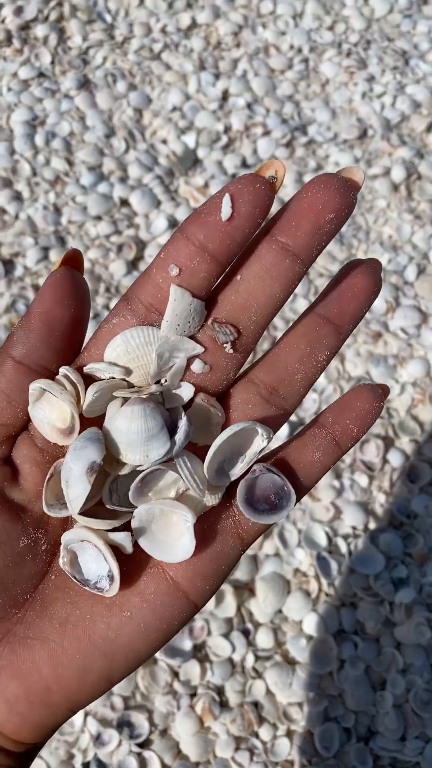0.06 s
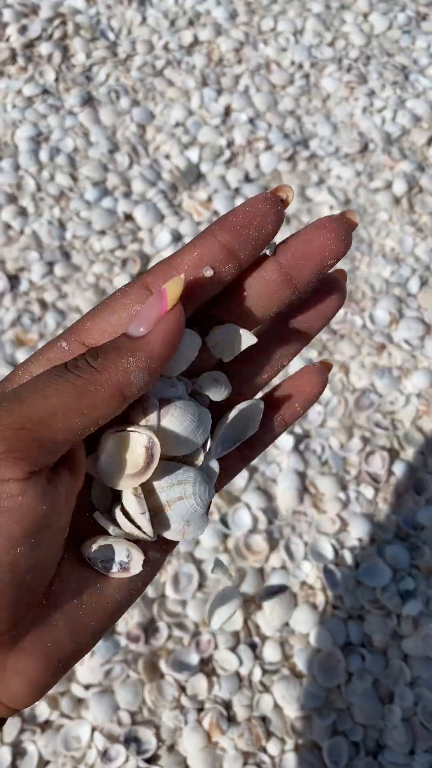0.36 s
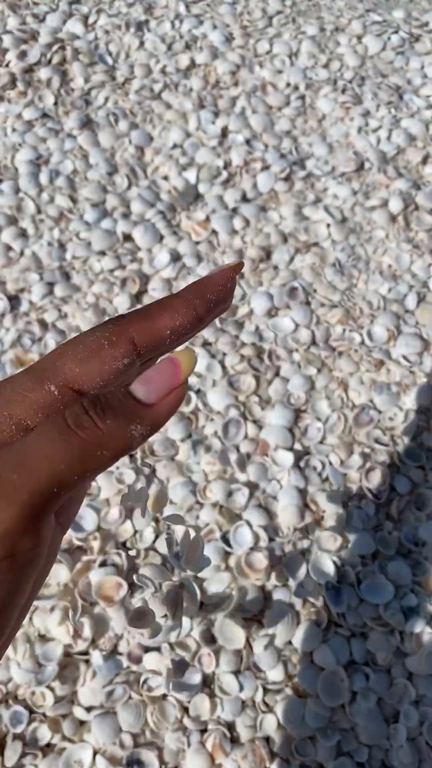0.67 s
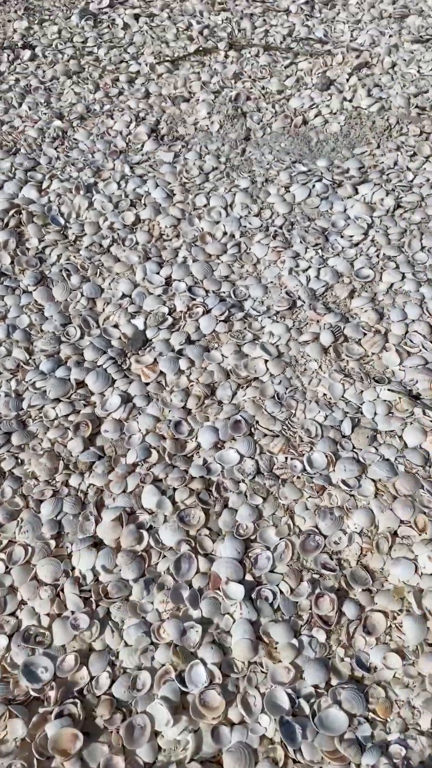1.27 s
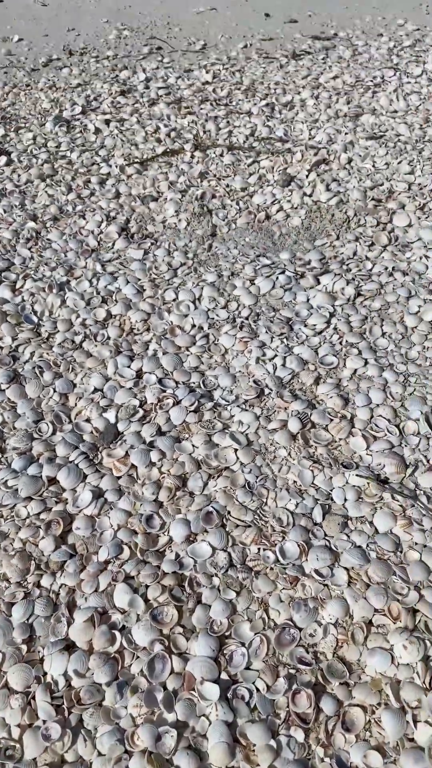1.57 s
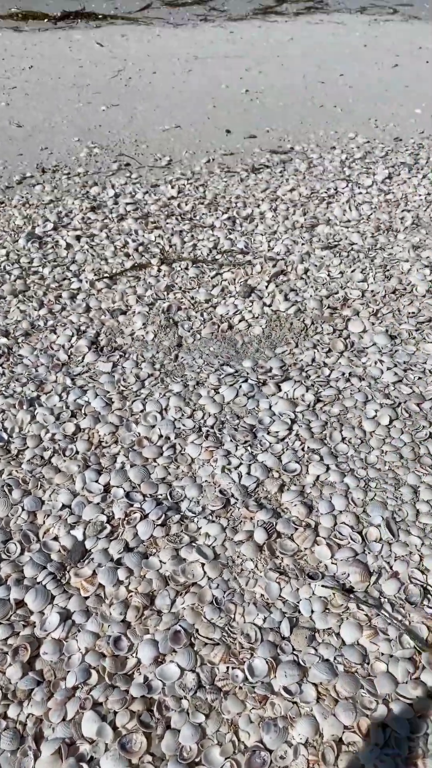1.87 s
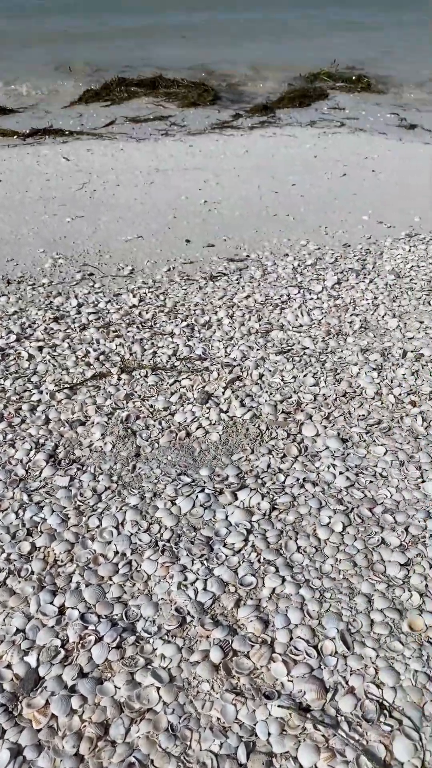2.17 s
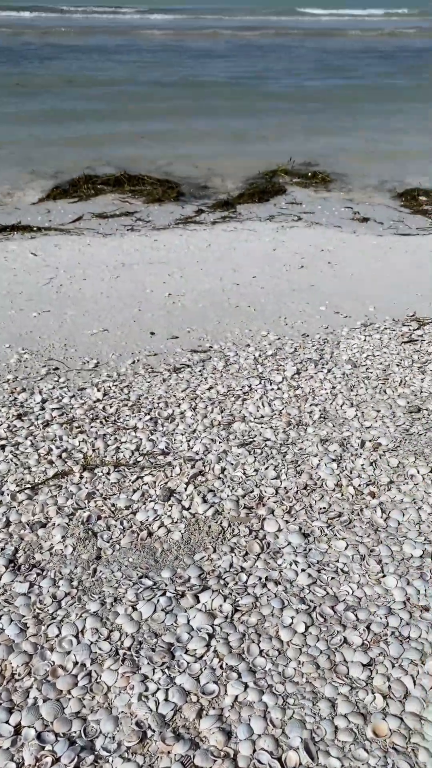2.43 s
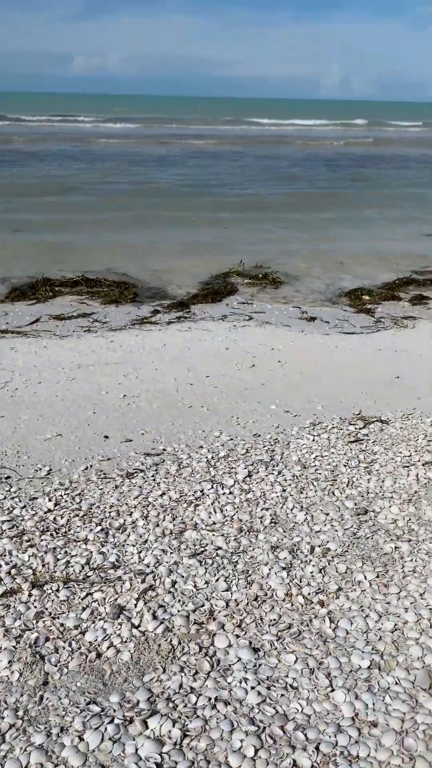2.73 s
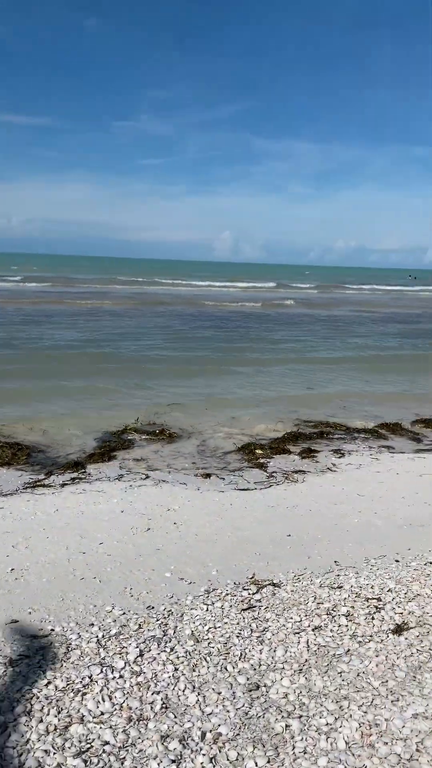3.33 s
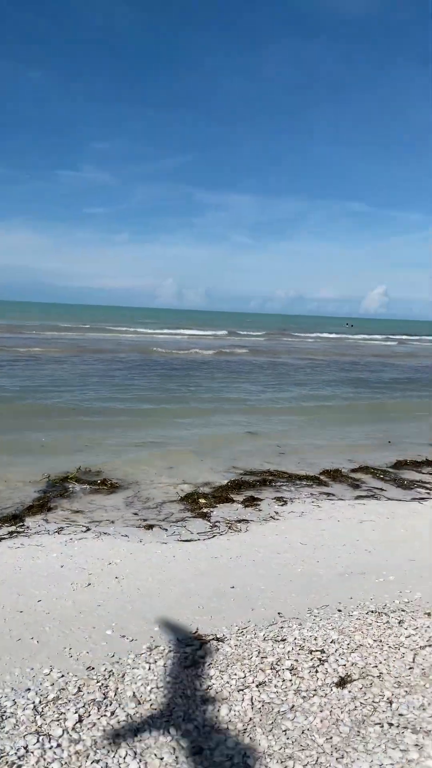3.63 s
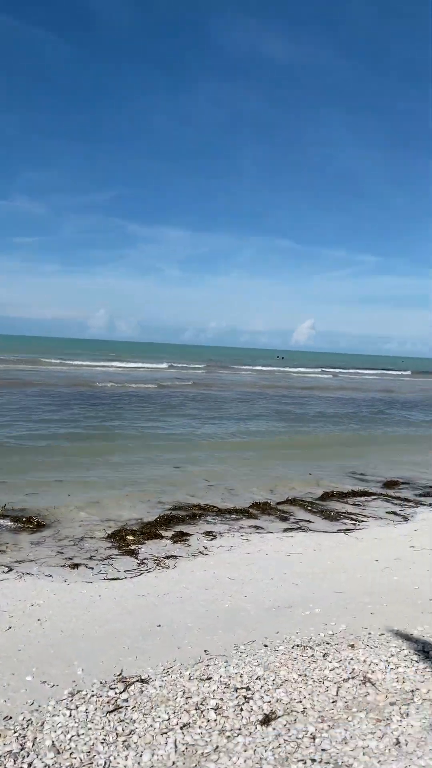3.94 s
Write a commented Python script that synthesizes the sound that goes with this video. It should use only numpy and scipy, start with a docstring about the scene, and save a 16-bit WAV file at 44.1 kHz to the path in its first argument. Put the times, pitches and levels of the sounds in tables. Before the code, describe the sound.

Small seashells click in a hand close to the microphone and spill onto a bed of shells, then one step crunches. Wind buffets the microphone and dies down, leaving low surf washing on the beach.

```python
"""Small seashells click close to the microphone as a handful slides off a tilting palm and lands on a
bed of shells; then a step crunches the bed. Each contact is a crack and a few briefly ringing modes.
Wind buffets the microphone with rumble, flutter and thumping eddies, then dies down, leaving the
steady wash of low surf beyond: bands of noise that boom, wash and hiss, wide and a little hollow."""
import sys
import numpy as np
from scipy import signal
from scipy.fft import rfft, irfft, next_fast_len
from scipy.io import wavfile
from scipy.ndimage import uniform_filter1d, map_coordinates

SR = 44100
rng = np.random.default_rng(int(sys.argv[2]) if len(sys.argv) > 2 else 0)


def unload_wav(signal):
    """Save mono or channel-first audio to the path in sys.argv[1] as 16-bit WAV at rate SR, clipped to [-1, 1]."""
    wavfile.write(
        sys.argv[1],
        SR,
        np.round(np.clip(np.atleast_2d(signal).T, -1, 1) * 32767).astype(np.int16),
    )


N = 176400
TIME = np.arange(N) / SR

# Close up, clear contacts of shell on shell, and the larger shells hitting the bed.
# Each row: time in seconds, relative peak in dB.
SHELL_CLICKS = [(.0785, -30.5), (.1865, -24), (.191, -23), (.2, -21), (.2066, -29), (.222, -28),
                (.255, -15), (.2645, -11.5), (.2773, -30), (.2962, -28), (.321, -31), (.359, -27),
                (.4279, -20.5), (.4433, -18), (.4487, -27), (.4723, -20), (.4802, -6.5), (.5175, -3.5),
                (.5236, -10), (.542, -15.5), (.5545, -26), (.564, -22.5), (.5902, -30), (.615, -20),
                (.6552, -23), (.6783, -17.5), (.6838, -19), (.8007, -16.5), (.8273, -15.5), (.8458, -15),
                (.8552, -17), (.8654, -23), (.8962, -20.5), (.9043, -25), (.9636, -22.5), (.9688, -26),
                (.9892, -26.5), (.9986, -30), (1.1502, -25), (1.174, -13), (1.1968, -18), (1.2197, -18),
                (1.3317, -18), (1.399, -21), (1.4823, -28), (1.5589, -29), (1.5895, -41), (2.0294, -32),
                (3.6245, -29)]
BED_IMPACTS = [(.7072, -4.5), (.7137, -6), (.7193, 1), (.7272, -4.5), (.7352, 1.5), (.7403, -5), (.7467, 3),
               (.754, 2.5), (.7628, -5), (.777, -10)]
# Swarms of small contacts: in the palm, landing and rolling to rest, the heel's bite, the full step.
# Each row: start, rise and hold in seconds, fall in dB per second, level in dB.
PALM_JOSTLES = [(.02, 0.01, 0.049, 103, -50), (.14, 0.12, 0.015, 177, -37.5),
                (.46, 0.058, 0.039, 216, -39.5)]
LANDING_STAGES = [(.73, 0.007, 0.023, 700, -20.5), (.75, 0.018, 0.014, 218, -30), (.89, .02, 0.03, 96, -46)]
HEEL_BITE = [(1.1725, 0.0013, 0.019, 452, -25)]
STEP_STAGES = [(1.148, 0.0021, 0.0062, 904, -34.5), (1.18, 0.024, 0.14, 142, -31),
               (1.5, 0.018, .02, 50, -47.5)]
# Tone of the shells at each stage. Each row: frequency in Hz, gain in dB.
CLICK_COLOUR = [(1000, -35), (3000, -10), (4200, -15), (5200, -7.5), (7000, 1.5), (10000, 5.5), (12000, -1),
                (14000, -6), (15600, -8), (16300, -26), (17000, -26)]
PALM_COLOUR = [(1000, -39), (3000, -1), (3900, -7), (4600, -1), (5600, -4), (7500, -1), (10000, 0.5),
               (12000, -8), (14000, -10), (15500, -12), (16500, -31)]
LANDING_COLOUR = [(1000, -18.5), (2500, -18), (3900, -16), (4400, -10), (5200, -9.5), (6500, 1), (8500, 2),
                  (10000, 0), (12000, -4), (14000, -10), (15600, -2), (17000, -40)]
HEEL_COLOUR = [(1000, -22), (3900, -12.5), (5000, 0), (6700, 1.5), (9000, -2), (12000, -12), (15400, -13),
               (16500, -39)]
STEP_COLOUR = [(1000, -35), (2700, -9), (4000, -10), (5300, -5), (6700, 1), (9500, -2.5), (12000, -7),
               (15400, -15), (16500, -44)]

# Wind strength at the microphone. Each row: time in seconds, relative level in dB.
WIND_STRENGTH = [(0.0, -25), (0.1, -25), (0.16, -21), (0.22, -21.5), (0.26, -30.5), (0.33, -22.5),
                 (0.45, -27.5), (0.52, -21), (0.56, -26), (0.6, -21), (0.73, -24.5), (0.79, -31),
                 (0.89, -25.5), (0.94, -21.5), (1.01, -35), (1.12, -25.5), (1.15, -38), (1.22, -30),
                 (1.39, -35.5), (1.43, -38), (1.49, -43), (1.53, -28.5), (1.66, -29.5), (1.84, -29),
                 (1.88, -37), (1.95, -26), (2.02, -42), (2.09, -36), (2.15, -31), (2.22, -34), (2.26, -52),
                 (2.36, -46), (2.39, -47), (2.45, -38.5), (2.49, -47), (2.55, -44), (2.62, -48),
                 (2.79, -42), (2.9, -44)]
# Sharp eddies breaking on it. Each row: time and width in seconds, relative level in dB.
SHARP_EDDIES = [(0.011, 0.0097, -29), (0.066, 0.0045, -25.5), (0.157, .003, -19.5), (.177, 0.0051, -19),
                (0.208, 0.0066, -20), (0.33, 0.0043, -22.5), (0.366, 0.0039, -26), (0.393, .0035, -26.5),
                (0.409, 0.0027, -26.5), (.531, 0.004, -28.5), (0.581, 0.026, -33), (.615, 0.0094, -24.5),
                (0.676, 0.0079, -26.5), (0.702, .004, -23.5), (0.741, 0.0052, -28.5), (0.797, 0.0027, -26),
                (0.936, 0.01, -26), (0.975, 0.0056, -26), (1.103, 0.0049, -32.5), (1.299, 0.01, -32.5),
                (1.352, .004, -32.5), (1.721, 0.014, -36.5), (1.948, 0.0043, -28), (2.161, 0.0024, -35)]
# Large eddies thumping it. Each row: time in seconds, pitch in Hz, relative level in dB.
LARGE_EDDIES = [(.172, 260, -22), (0.211, 183, -18.5), (.335, 220, -20), (0.526, 120, -16.5),
                (0.932, 89, -23.5), (1.296, 290, -27), (1.542, 129, -20), (1.651, 143, -23),
                (1.72, 146, -21), (1.912, 169, -25), (1.951, 192, -22.5), (1.986, 163, -22.5),
                (2.135, 99, -28), (2.163, 190, -24), (2.398, 69.5, -32)]
# Tone of the wind's layers. Each row: frequency in Hz, gain in dB.
RUMBLE_COLOUR = [(20, -29), (35, -12), (60, 4), (115, -0.5), (175, -2), (250, -6.5), (350, -11),
                 (600, -31.5), (1200, -46), (3000, -80)]
FLUTTER_COLOUR = [(60, -45), (200, 0), (350, -0.5), (600, -3), (900, -5.5), (1400, -18), (3000, -58),
                  (8000, -74)]
EDDY_COLOUR = [(60, -37), (200, 1), (360, 3), (600, -1.5), (1000, -8), (1400, -26), (3000, -49),
               (8000, -74)]

# The near waves. Each row: time in seconds, then relative levels of boom, wash and foam hiss in dB.
WAVE_LEVELS = [(0, -42, -45, -45.5), (1.05, -44, -45, -56.5), (1.35, -43, -39, -43.5), (1.6, -56, -40, -40),
               (1.9, -50.5, -37.5, -38), (2.3, -37, -43, -43.5), (2.65, -47.5, -42.5, -44),
               (2.95, -40, -42, -42.5), (3.2, -35.5, -41, -39.5), (3.32, -40.5, -39.5, -39),
               (3.43, -35.5, -37, -38), (3.7, -37.5, -42.5, -40.5), (4, -37.5, -43, -42.5)]
# Tone of those three layers and of the distant surf. Each row: frequency in Hz, gain in dB.
BOOM_COLOUR = [(20, -22), (45, 0.5), (80, 1), (130, -6.5), (220, -1), (350, 1), (550, -2.5), (800, -22),
               (1500, -57), (4000, -72)]
WASH_COLOUR = [(100, -50), (400, -8.5), (680, 3.5), (850, -0.5), (1150, -7.5), (1800, -15.5), (4000, -47),
               (8000, -70)]
FOAM_COLOUR = [(300, -31), (900, 3), (1400, 4.5), (2000, 1.5), (2800, 1), (4000, -5.5), (6500, -16),
               (10000, -19.5), (12000, -24.5), (15000, -40), (16000, -50)]
FAR_COLOUR = [(300, -15), (1000, 6), (1600, -4), (2200, 4), (2900, 1.5), (4000, -2), (6500, -11),
              (10000, -19), (15000, -27), (16000, -52)]
# How alike the surf is on both sides. Each row: frequency in Hz, correlation (1 is mono).
SURF_ALIKE = [(100, 1), (400, 0.96), (800, 1), (1200, 0.17), (1800, 0.69), (3000, 0.057), (5000, 0.23),
              (7000, 1), (15000, 1)]
# The surf's lean to the left. Each row: frequency in Hz, dB added left and taken from the right.
SURF_LEAN = [(300, -1.5), (800, 1), (1900, 1), (2800, 0), (4200, 0), (6000, 0)]
# Splashy patches in the surf. Each row: frequency in Hz, rms level swing in dB.
SPLASH_DEPTH = [(300, 2.5), (2000, 2), (8000, 3)]

# A moving band in which wind and surf sound wide.
# Each row: time in seconds, lower and upper edge in Hz, left-right phase gap in radians.
MOVING_WIDE_BAND = [(.9, 680, 1390, 3.44), (1.25, 464, 1200, 2.1), (1.45, 257, 930, 2.1),
                    (1.6, 577, 930, 1.5), (2.15, 468, 776, 1.9), (2.28, 140, 690, 2.7),
                    (2.47, 148, 660, 3.07), (2.58, 156, 860, 3.73), (2.7, 255, 810, 2.4),
                    (2.82, 390, 1230, 2.7), (2.93, 520, 1240, 3.5), (3.05, 596, 1100, 2.7),
                    (4, 630, 1100, 2.36)]
# A steady wide band above it: lower and upper edge in Hz, phase gap in radians.
UPPER_WIDE_BAND = (2300, 2960, 2.2)
# A hollow in the centre of the image. Each row: time in seconds, pitch in Hz, depth in dB.
CENTRE_HOLLOW = [(2.2, 330, -1), (2.37, 370, 2.5), (2.5, 420, 9), (2.59, 318, 8), (2.7, 430, 5),
                 (2.84, 576, 5), (2.93, 760, -2), (3.02, 800, 1)]
# A fixed all-pass stereo effect turns left against right in phase, widening the treble.
# Each row: frequency in Hz, lead of the left in radians.
TREBLE_PHASE_TURN = [(0, 0), (2800, 0), (4300, .8), (5000, .35), (5700, .5), (6300, 1.9), (6800, 2.8),
                     (7300, 3.14), (10400, 6.28), (12900, 9.1), (13600, 9.42), (16500, 12.5)]


def shells():
    """Close in front, shells jostle in the palm, fall onto the bed and crunch finely underfoot."""
    palm = clicks(SHELL_CLICKS, CLICK_COLOUR)
    palm += swarm(PALM_JOSTLES, PALM_COLOUR, per_s=840, spread_db=4.0)
    fall = clicks(BED_IMPACTS, LANDING_COLOUR)
    fall += swarm(LANDING_STAGES, LANDING_COLOUR, per_s=1200, spread_db=3.5)
    heel = swarm(HEEL_BITE, HEEL_COLOUR, per_s=2700, spread_db=-4.0)
    step = swarm(STEP_STAGES, STEP_COLOUR, per_s=3100, spread_db=2.0)
    return palm + fall + heel + step


def shell_strike(modes=6, ring_t60_s=.014, crack_t60_s=.003, crack_db=17, contact_s=.00015):
    """One shell struck: a crack and a few brief modes of its own; peak 1."""
    t = TIME[:2048]
    hz = rng.uniform(4600, 15800, (modes, 1))
    weights = rng.standard_normal((modes, 1)) / np.sqrt(modes / 2)
    ring = (weights * np.sin(2 * np.pi * hz * t)).sum(0) * amp(-60 * t / ring_t60_s)
    crack = amp(crack_db - 60 * t / crack_t60_s) * rng.standard_normal(len(t))
    hit = (ring + crack) * (1 - np.exp(-t / contact_s))
    return hit / np.abs(hit).max()


def clink(typical_hz=5120, pitch_spread=0.069, t60_s=0.022, relative_db=-15):
    """The lowest mode of a whole shell outlasts the click; every shell has its own pitch."""
    t = TIME[:2048]
    hz = typical_hz * np.exp(pitch_spread * rng.standard_normal())
    return amp(relative_db - 60 * t / t60_s) * np.sin(2 * np.pi * hz * t)


def clicks(contacts, colour, gain_db=0.5, rebound_s=0.0022, rebound_db=-9.5):
    """Single shells strike and clink, each followed at once by a weaker rebound."""
    out = np.zeros(N)
    for start, db in contacts:
        gap_s = rebound_s * rng.uniform(0.39, 2.2)
        for delay, bounce_db in (0, 0), (gap_s, rebound_db):
            hit = shell_strike() + clink()
            out[round((start + delay) * SR):][:len(hit)] += amp(db + gain_db + bounce_db) * hit
    return coloured(out, colour)


def swarm(stages, colour, per_s, spread_db, shell_count=16):
    """Many small random contacts among a few shells, in stages that rise, hold and fall."""
    power = np.zeros(N)
    for start, rise, hold, fall, db in stages:
        attack = np.clip((TIME - start) / rise, 0, 1)
        falling_s = np.maximum(TIME - start - rise - hold, 0)
        power += (attack * amp(db - fall * falling_s)) ** 2
    taps = np.zeros(N)
    for _ in range(shell_count):
        force = amp(spread_db * np.minimum(rng.exponential(size=N), 3))
        struck = rng.random(N) < per_s / shell_count / SR
        taps += signal.oaconvolve(force * struck, shell_strike())[:N]
    return unit(coloured(taps, colour)) * np.sqrt(power)


def bed_reflection(x, level_db=-14.5, t60_s=0.014):
    """The rough bed of shells throws back a very short reflection, different on each side."""
    t = TIME[:1024]
    tail = rng.standard_normal((2, len(t))) * amp(-60 * t / t60_s)
    tail /= np.linalg.norm(tail[0])
    return amp(level_db) * signal.fftconvolve(x[None], tail, axes=1)[:, :N]


def wind(rumble_db=-1.5, flutter_db=-18, eddy_db=2.5):
    """On the microphone, rumble and flutter follow the wind's strength; sharp eddies add short thuds."""
    strength_db, = curves(WIND_STRENGTH, TIME)
    alike = [(100, 0.6)]  # the same left-right correlation at every frequency
    rumble = amp(strength_db + rumble_db + 2.2 * wobble(40)) * rush(RUMBLE_COLOUR, alike)
    flutter = amp(strength_db + flutter_db + 4.8 * wobble(70)) * rush(FLUTTER_COLOUR, alike)
    bursts = sum(amp(db + eddy_db) * bell((TIME - at) / width) for at, width, db in SHARP_EDDIES)
    eddies = bursts * amp(2.26 * wobble(130)) * rush(EDDY_COLOUR, alike)
    return rumble + flutter + eddies


def thumps(width_cycles=0.6, gain_db=2):
    """Each large eddy is a cycle or two of low pressure swing, slightly out of step left and right."""
    out = np.zeros((2, N))
    for at, hz, db in LARGE_EDDIES:
        cycles = (TIME - at) * hz
        phase = rng.uniform(0, 2 * np.pi) + .25 * rng.standard_normal((2, 1))
        out += amp(db + gain_db) * bell(cycles / width_cycles) * np.sin(2 * np.pi * cycles + phase)
    return out


def surf(far_db=-45):
    """Near waves boom, wash and hiss over steady distant surf, patchy in time and pitch."""
    levels_db = [*curves(WAVE_LEVELS, TIME), far_db]
    colours = [BOOM_COLOUR, WASH_COLOUR, FOAM_COLOUR, FAR_COLOUR]
    sea = sum(amp(db) * rush(colour, SURF_ALIKE) for db, colour in zip(levels_db, colours))
    sea = filtered(sea, lambda hz: amp(along(SURF_LEAN, hz) * np.array([[1], [-1]])))
    hz, _, spectra = signal.stft(sea, SR, nperseg=1024)
    patches = rng.standard_normal(spectra.shape[1:])
    patches = uniform_filter1d(patches, size=6, axis=0)  # smooth across pitch
    patches = uniform_filter1d(patches, size=4, axis=1)  # and across time
    splash_db = along(SPLASH_DEPTH, hz)[:, None] * unit(patches)
    return signal.istft(spectra * amp(splash_db), nperseg=1024)[1][:, :N]


def widen(x, edge_octaves=0.31, hollow_octaves=0.22):
    """Left and right part in phase in two bands; a hollow opens in the centre and climbs in pitch."""
    hz, t, spectra = signal.stft(x, SR, nperseg=1024)
    octaves = lambda from_hz: np.log2((hz[:, None] + 1) / from_hz)
    above = lambda edge_hz: (1 + np.tanh(octaves(edge_hz) / edge_octaves)) / 2
    bands = curves(MOVING_WIDE_BAND, t), UPPER_WIDE_BAND
    phase = sum(gap * above(low) * (1 - above(high)) for low, high, gap in bands)
    spectra = spectra * np.exp(.5j * np.array([-phase, phase]))
    hollow_hz, depth_db = curves(CENTRE_HOLLOW, t)
    scooped = 1 - amp(-depth_db * bell(octaves(hollow_hz) / hollow_octaves))
    return signal.istft(spectra - scooped * spectra.mean(0), nperseg=1024)[1][:, :N]


def rush(colour, alike):
    """Coloured stereo noise of rms 1 with a given likeness of left and right."""
    def mid_and_side(hz):
        angle = np.arccos(np.clip(along(alike, hz), -1, 1)) / 2
        return amp(along(colour, hz)) * [np.cos(angle), np.sin(angle)]
    mid, side = filtered(rng.standard_normal((2, N)), mid_and_side)
    return unit(np.array([mid + side, mid - side]))


def wobble(knots_per_s):
    """A smooth random curve."""
    knots = rng.standard_normal(int(N * knots_per_s / SR) + 4)
    return map_coordinates(knots, [TIME * knots_per_s])


def coloured(x, colour):
    """x through a smooth tone curve."""
    return filtered(x, lambda hz: amp(along(colour, hz)))


def filtered(x, response):
    """x through a complex frequency response."""
    size = next_fast_len(N + 8192)
    hz = np.fft.rfftfreq(size, 1 / SR)
    return irfft(rfft(x, size) * response(hz), size)[..., :N]


def along(points, hz):
    """Read (Hz, value) points on a log axis."""
    knots_hz, values = np.transpose(points)
    return np.interp(np.log(hz + 1), np.log(knots_hz + 1), values)


def curves(rows, t):
    """Each column after the time, read at times t."""
    times, *columns = np.transpose(rows)
    return [np.interp(t, times, column) for column in columns]


def bell(x):
    """A Gaussian bump of height 1."""
    return np.exp(-.5 * x ** 2)


def amp(db):
    """Decibels to gain."""
    return 10 ** (np.asarray(db) / 20)


def unit(x):
    """Scale to rms 1."""
    return x / np.sqrt(np.mean(x ** 2) + 1e-20)


def scene():
    """On the shore: shells close in front, wind on the microphone, surf beyond."""
    close = shells()
    return close + bed_reflection(close) + widen(wind() + thumps() + surf())


def record(dry, top_hz=16700):
    """A fixed all-pass stereo effect widens the treble; everything above the band limit is cut."""
    def response(hz):
        lead = np.interp(hz, *np.transpose(TREBLE_PHASE_TURN))
        return np.exp(.5j * np.array([lead, -lead])) * (hz < top_hz)
    return filtered(dry, response)


dry = scene()
out = record(dry)
unload_wav(out)
```